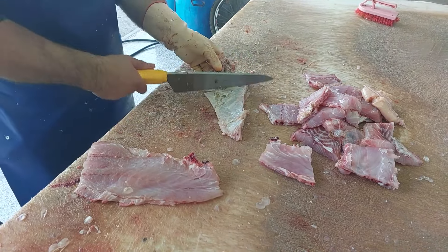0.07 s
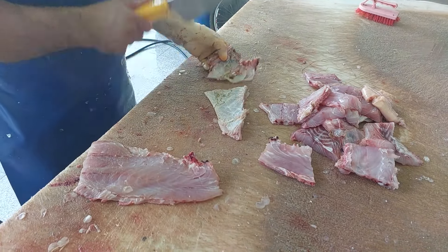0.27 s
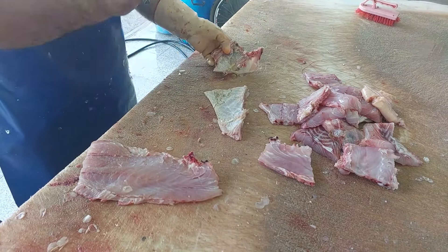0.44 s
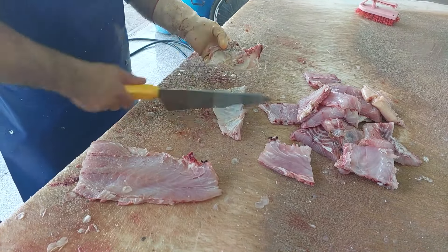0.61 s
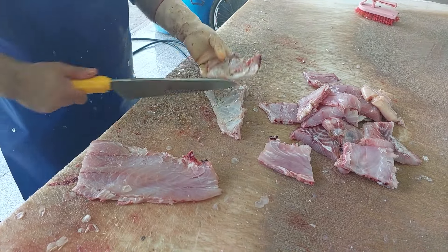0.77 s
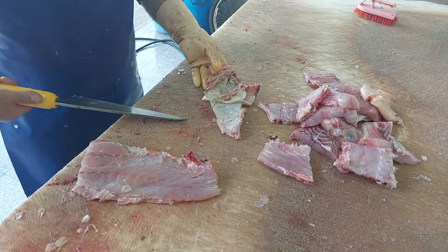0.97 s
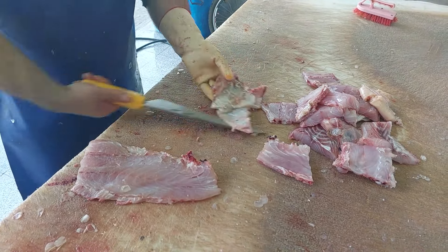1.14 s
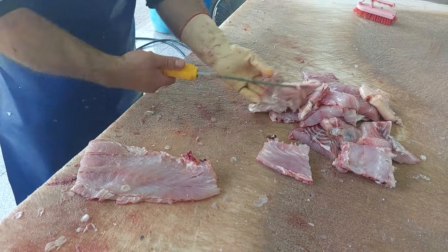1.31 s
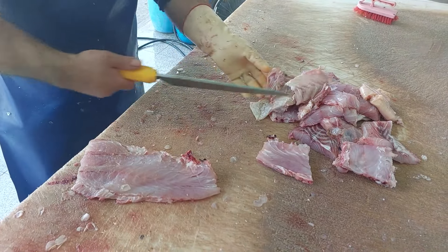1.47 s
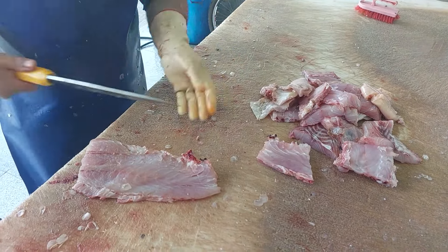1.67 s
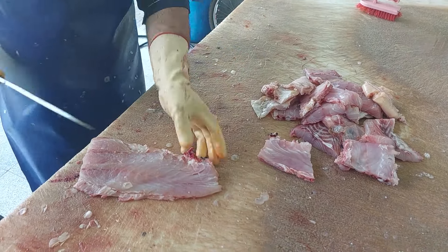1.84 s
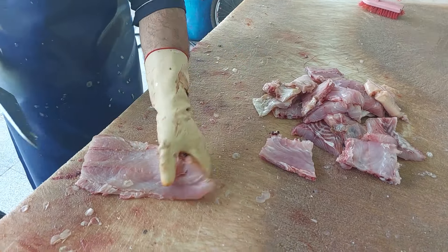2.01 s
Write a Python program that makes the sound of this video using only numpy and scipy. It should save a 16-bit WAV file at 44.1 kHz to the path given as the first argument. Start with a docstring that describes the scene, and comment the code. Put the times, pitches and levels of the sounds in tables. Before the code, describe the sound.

Two heavy knife chops through fish into a thick wooden table, booming in a hard-walled room

```python
"""In a hard-walled room, a heavy knife chops twice through fish into a thick wooden table.
Each chop is a short knock with puffs of noise; dying tones make the table boom and the blade sing thinly.
Noise puffs and pings tick, crackling grains scrape, low tones plop and a dull rumble drags a fillet.
Fading noise gives the echoes, over the steady noisy hum of the room.
Two microphones hear it all, and a limiter gently holds down the loudest moments."""
import sys
import numpy as np
from scipy import signal
from scipy.fft import rfft, irfft
from scipy.io import wavfile

SR = 44100
rng = np.random.default_rng(int(sys.argv[2]) if len(sys.argv) > 2 else 0)


def boost_factor(decibels):
    """Convert a level in decibels to a linear amplitude factor."""
    exponent = np.asarray(decibels, float) / 20
    return 10 ** exponent


def transcribe(u):
    """Save the signal u as a 16-bit wav file named by the first command-line argument.

    u: samples, shape (n,) or (channels, n), limited to [-1, 1]; the rate is SR.
    q: integer samples, one column per channel.
    """
    v = np.clip(np.atleast_2d(u).T, -1, 1)
    q = np.round(v * 32767).astype(np.int16)
    wavfile.write(sys.argv[1], SR, q)


N = 92610  # length in samples

# colour of the room hum: f/Hz, relative level per Hz/dB
HUM_COLOUR = [(20, -26), (45, -3), (90, 0.5), (170, 0.5), (250, -4.5), (500, -7.5), (1000, -14.5),
              (2400, -19), (3300, -27), (6500, -34), (8000, -32.5), (14000, -39), (16300, -60)]
# drift of the room hum: t/s, level/dB
HUM_DRIFT = [(0.0, -43), (0.33, -45), (0.49, -46), (0.88, -44.5), (1.04, -44.5), (1.61, -47), (2.1, -45.5)]
# likeness of the two microphones in sound from all around: f/Hz, likeness (1 = identical)
LIKENESS = [(60, 0.98), (180, 0.97), (550, 0.68), (1650, 0.11), (4970, 0.04), (15000, 0.13)]
# dull rumble of a dragged fillet: f/Hz, relative level per Hz/dB
DRAG_COLOUR = [(60, -4.5), (150, -5), (700, -17), (1500, -22), (4000, -38)]
# time the echoes take to fall by 60 dB: f/Hz, t60/s
ECHO_DECAY = [(60, 2.05), (160, 1.27), (420, 0.65), (1100, 0.71), (2910, 0.66), (7680, 0.52)]
# colour of a chop as the walls return it: f/Hz, relative level/dB
ECHO_COLOUR = [(20, -47), (35, -38), (70, -3), (100, 0), (230, 0.5), (450, 2.5), (700, 1.5), (1500, 1),
               (2600, -8), (3300, -18.5), (5000, -27), (8000, -33.5), (15000, -43.5)]
# wet ticks with a short ping: t/s, puff level/dB, puff f/Hz, ping level/dB, ping f/Hz
TICKS = [(0.1428, -30, 4670, -26, 4860), (0.2152, -37.5, 6150, -39, 11800), (.2675, -45, 5000, -43, 5080),
         (.312, -69, 5030, -50, 5000), (.355, -60, 12000, -63, 11900), (0.683, -28.5, 4900, -40, 5460),
         (0.876, -45.5, 12800, -51, 14500), (.9834, -43.5, 8800, -74, 12700),
         (1.0303, -51, 10900, -58, 13000), (1.151, -40.5, 8400, -59.5, 7000),
         (1.152, -59, 12800, -70, 13500), (1.1892, -61, 9200, -43.5, 5140),
         (1.2372, -43, 6840, -45.5, 4830), (1.2605, -45.5, 11000, -62, 12100),
         (1.3241, -57, 4940, -60, 5100), (1.613, -50, 8200, -62, 4840), (1.94, -53, 9000, -66, 13000),
         (1.999, -50, 8000, -62, 5600), (2.035, -58, 8000, -58, 5570)]
# a piece of fish drops on the table: t/s, level/dB, f/Hz
PLOPS = [(.98, -29, 610), (2.03, -42, 650)]
# blade and glove slide on wet wood: start t/s, length/s, level/dB
SCRAPES = [(0.095, 0.18, -40.5), (1.028, 0.23, -46.5), (1.56, 0.03, -61), (1.893, 0.21, -53.5)]
# colour of the crackle in a wet slide: f/Hz, relative level per Hz/dB
CRACKLE_COLOUR = [(1500, -30), (3000, -10), (4500, -18), (7000, 2.5), (9000, 6), (12000, -2), (15000, -0.5)]
# tones of the blade when damped by wood and fish: f/Hz, relative level/dB, t60/s
DAMPED_BLADE = [(4800, 0, .008), (5400, -4, .008), (6600, -1, .008), (10800, -3, .008), (12100, -1, .008),
                (13500, 0, .008)]
# chops: t/s, knock f/Hz, echo level/dB, boom level/dB, splat level/dB, echo brightness/dB per octave
CHOPS = [(0.1015, 1128, 20, -21, -19.5, 0), (0.6525, 1900, 19.5, -24.5, -24, 2.5)]
# tones of the struck table: f/Hz, relative level/dB, t60/s
TABLE_TONES = [(71.6, -11, 0.96), (98.05, -2.5, 0.74), (157.8, -2.5, 0.62), (239, -5, 0.47),
               (340.7, 6, 0.33), (542, 14.5, 0.084), (676.5, 2, 0.26), (891, 6, 0.17), (1070, 3.5, 0.25),
               (1160, 7, 0.067), (1516, 4.5, 0.15), (1676, -23, 0.12)]
# tones of the free blade: f/Hz, relative level/dB, t60/s
FREE_BLADE = [(8990, -9, .5), (11040, -3, .6), (14530, 0, .8)]
# the freed blade sings until it touches something: start t/s, length/s, level/dB
SINGS = [(.135, .19, -45), (.68, .13, -44)]
# difference between the microphones: f/Hz, left minus right level/dB
LEFT_RIGHT_TILT = [(60, 0.0), (180, 0.0), (550, 1), (1650, -4), (4970, -2), (15000, -3.5)]
# colour from the microphone openings: f/Hz, level/dB
MIC_COLOUR = [(5500, -0.5), (7000, -1.5), (8300, -13.5), (9600, -15.5), (11500, -4.5), (15000, -7.5),
              (15600, -30), (16400, -30)]


def evened(x):
    """Scales a sound to an rms (average strength) of 1."""
    return x / np.sqrt(np.mean(x ** 2) + 1e-20)


def read(points, hz):
    """Reads a table between its points, along a logarithmic frequency axis."""
    f, value = np.transpose(points)
    return np.interp(np.log(hz + 1), np.log(f + 1), value)


def add(mix, start_s, sound):
    """Mixes a sound in at its start time, cutting off what runs past the end."""
    part = mix[max(round(start_s * SR), 0):][:len(sound)]
    part += sound[:len(part)]


def coloured(x, db_points):
    """Makes each frequency louder or softer, as a table says."""
    hz = np.fft.rfftfreq(x.shape[-1], 1 / SR)
    return irfft(rfft(x) * boost_factor(read(db_points, hz)), x.shape[-1])


def pair(length):
    """Two noises as alike as two microphones hear sound that comes from all around."""
    a, b = rfft(rng.standard_normal((2, length)))
    same = read(LIKENESS, np.fft.rfftfreq(length, 1 / SR))
    right = same * a + np.sqrt(1 - same ** 2) * b
    return irfft(np.array([a, right]), length)


def ring(modes):
    """Half a second of dying sine tones, as a struck solid makes."""
    t = np.arange(SR // 2) / SR
    return sum(boost_factor(db - 60 * t / t60) * np.sin(2 * np.pi * hz * t) for hz, db, t60 in modes)


def waver(modes, depth_db):
    """Dying tones whose strengths flutter separately, as in a loosely held object."""
    smooth = signal.butter(2, 25, fs=SR)  # flutter slower than about 25 Hz
    total = 0
    for mode in modes:
        wobble = signal.lfilter(*smooth, rng.standard_normal(SR))[SR // 2:]
        total = total + ring([mode]) * boost_factor(depth_db * evened(wobble))
    return total


def burst(hz, t60):
    """A dying puff of noise, from an octave below hz to an octave above or near the top of the range."""
    t = np.arange(SR // 10) / SR
    band = signal.butter(2, [hz / 2, min(hz * 2, SR / 2.2)], "bandpass", fs=SR)
    noise = evened(signal.lfilter(*band, rng.standard_normal(len(t))))
    return noise * boost_factor(-60 * t / t60)


def hum():
    """Steady noise of the room from all around, with a drifting level."""
    s, db = np.transpose(HUM_DRIFT)
    return evened(coloured(pair(N), HUM_COLOUR)) * boost_factor(np.interp(np.arange(N) / SR, s, db))


def room():
    """One second of echo noise from the walls; each frequency dies at its own speed."""
    hz, t, z = signal.stft(pair(SR), SR, nperseg=512)
    decay = boost_factor(-60 * t / read(ECHO_DECAY, hz)[:, None])
    return signal.istft(z * decay, SR, nperseg=512)[1][:, :SR]


def arriving(tail):
    """The far walls answer late, so echoes build up, then end in silence; left energy is 1."""
    first_echo_s, early_lack_db, build_s = 0.007, -0.5, 0.018
    t = np.arange(SR) / SR
    onset = np.minimum(t / first_echo_s, 1) ** 2
    build = boost_factor(early_lack_db * np.exp(-t / build_s))
    end = np.clip(10 * (1 - t) - 1, 0, 1)
    tail = tail * onset * build * end
    return tail / np.linalg.norm(tail[0])


def drag():
    """A dull rumble swells and stays as a fillet slides over the wood."""
    start_s, rise_s, level_db = 1.902, 0.18, -40
    swell = np.clip((np.arange(N) / SR - start_s) / rise_s, 0, 1)
    return boost_factor(level_db) * swell * evened(coloured(pair(N), DRAG_COLOUR))


def ticks():
    """Wet contacts: a puff of noise and a short ping together."""
    puff_t60_s, ping_t60_s, ping_rise_s = 0.059, 0.031, 0.0012
    out, t = np.zeros(N), np.arange(SR // 2) / SR
    for s, puff_db, puff_hz, ping_db, ping_hz in TICKS:
        add(out, s, boost_factor(puff_db) * burst(puff_hz, puff_t60_s))
        ping = ring([(ping_hz, ping_db, ping_t60_s)])
        add(out, s, ping * np.minimum(t / ping_rise_s, 1))
    return out


def plops():
    """Soft pieces land on the table: two short low tones with a gentle start."""
    t60_s, rise_s = 0.06, 0.0049
    out, t = np.zeros(N), np.arange(SR // 2) / SR
    for s, db, hz in PLOPS:
        thud = ring([(hz, 0, t60_s), (0.46 * hz, -6, t60_s)])
        add(out, s, boost_factor(db) * thud * np.minimum(t / rise_s, 1))
    return out


def scrapes():
    """Sliding makes random tiny clicks, heard as hiss and through the damped blade."""
    grains_per_s, spread_db, ring_share = 900, 4, 0.3
    out, t = np.zeros(N), np.arange(N) / SR
    strength = boost_factor(spread_db * np.minimum(rng.exponential(1, N), 3))
    grains = strength * (rng.random(N) < grains_per_s / SR)
    grains = grains * rng.choice([-1., 1.], N)
    hiss = evened(coloured(grains, CRACKLE_COLOUR))
    blade = evened(signal.oaconvolve(grains, ring(DAMPED_BLADE)[:SR // 10])[:N])
    for s, length, db in SCRAPES:
        progress = np.clip((t - s) / length, 0, 1)
        swell = np.sin(np.pi * progress)  # rises and falls once
        out += boost_factor(db) * swell * ((1 - ring_share) * hiss + ring_share * blade)
    return out


def blade_singing():
    """The freed blade rings in high, wavering tones that fade out as it touches something."""
    rise_s, fade_s, waver_db = 0.0066, 0.1, 5
    out, t = np.zeros(N), np.arange(SR // 2) / SR
    for s, length, db in SINGS:
        shape = np.clip(np.minimum(t / rise_s, (length - t) / fade_s), 0, 1)
        add(out, s, boost_factor(db) * waver(FREE_BLADE, waver_db) * shape)
    return out


def chops():
    """The edge knocks and cracks on wood, the cut splats, and the table booms."""
    knock_db, knock_t60_s, knock_rise_s = 4, 0.016, 0.0014
    crack_db, noise_t60_s, splat_lead_s = -26, 0.02, 0.00049
    boom_rise_s, boom_waver_db = 0.011, 2.5
    out, t = np.zeros(N), np.arange(SR // 2) / SR
    for s, hz, _, boom_db, splat_db, _ in CHOPS:
        partials = [(1, 0), (0.55, -6), (1.45, -7), (2, -11)]  # pitch ratio, level/dB
        knock = ring([(ratio * hz, db, knock_t60_s) for ratio, db in partials])
        # minus sign: the wave first swings downward
        add(out, s, -boost_factor(knock_db) * knock * np.minimum(t / knock_rise_s, 1))
        add(out, s + knock_rise_s / 2, boost_factor(crack_db) * burst(3100, noise_t60_s))
        add(out, s - splat_lead_s, boost_factor(splat_db) * burst(14000, noise_t60_s))
        boom = waver(TABLE_TONES, boom_waver_db)
        add(out, s, boost_factor(boom_db) * boom * np.minimum(t / boom_rise_s, 1))
    return out


def scene():
    """Direct sound reaches the left microphone first; walls return each chop with their colour."""
    right_lag_s, heavy_send_db, light_send_db = 0.000203, -12.5, -10
    background = hum() + drag()
    walls = room()
    light = ticks() + plops() + scrapes()
    heavy = blade_singing() + chops()
    direct = heavy + light
    sent = boost_factor(heavy_send_db) * heavy + boost_factor(light_send_db) * light
    echo = signal.fftconvolve(sent[None], arriving(walls), axes=1)[:, :N]
    for s, _, echo_db, _, _, slope_db in CHOPS:
        # brightness tilts the colour around 1000 Hz
        colour = [(f, db + slope_db * np.log2(f / 1000)) for f, db in ECHO_COLOUR]
        for side, tail in zip(echo, arriving(coloured(walls, colour))):
            add(side, s, boost_factor(echo_db) * tail)
    # a phase turn at each frequency delays by less than whole samples
    delay = np.exp(-2j * np.pi * np.fft.rfftfreq(N, 1 / SR) * right_lag_s)
    late = irfft(rfft(direct) * delay, N)
    return np.array([direct, late]) + echo + background


def microphones(x):
    """Two microphones with unequal tone, both coloured by their openings."""
    left = coloured(x[0], [(f, db / 2) for f, db in LEFT_RIGHT_TILT])
    right = coloured(x[1], [(f, -db / 2) for f, db in LEFT_RIGHT_TILT])
    return coloured(np.array([left, right]), MIC_COLOUR)


def limiter(x):
    """Gently turns loud moments down within milliseconds, then recovers steadily."""
    limit_db, attack_s, recovery_db_per_s = -16, 0.004, 122
    cut_per_db = 0.5 - 1 / 2.6  # dB of turning down for each dB over the limit
    keep = np.exp(-1 / (attack_s * SR))
    smooth = [1 - keep], [1, -keep]
    power_db = 10 * np.log10(signal.lfilter(*smooth, (x ** 2).mean(0)) + 1e-12)
    # hold each peak while it sinks at the recovery speed
    fall = np.arange(N) * recovery_db_per_s / SR
    held_db = np.maximum.accumulate(power_db + fall) - fall
    over_db = np.maximum(held_db - limit_db, 0)
    return x / boost_factor(cut_per_db * signal.lfilter(*smooth, over_db))


def band_limit(x):
    """A steep low-pass at the top of the band."""
    return signal.sosfilt(signal.butter(12, 16460, fs=SR, output="sos"), x)


def record(dry):
    """The microphones, the limiter, then soft rounding of the wave's peaks."""
    mix = np.tanh(limiter(microphones(dry)))
    return band_limit(mix)


dry = scene()
out = record(dry)
transcribe(out)
```